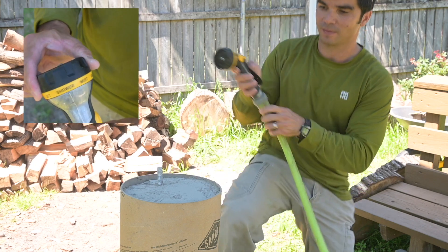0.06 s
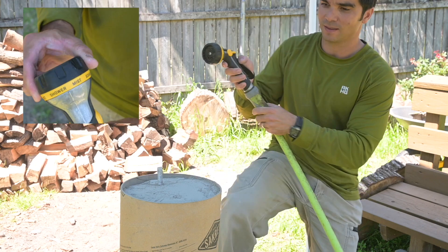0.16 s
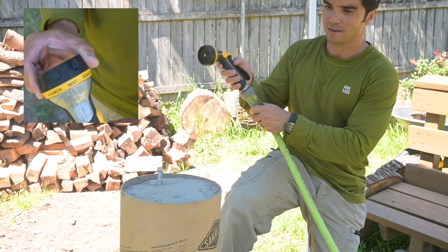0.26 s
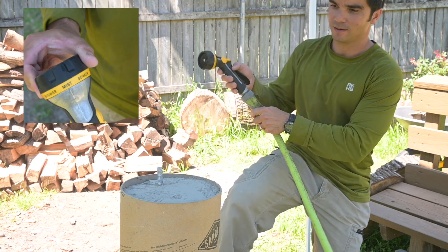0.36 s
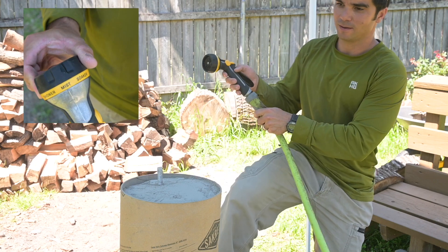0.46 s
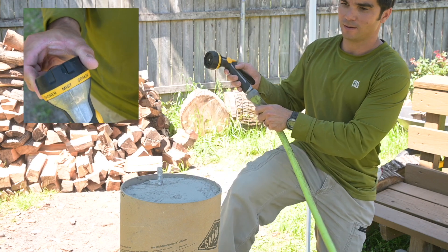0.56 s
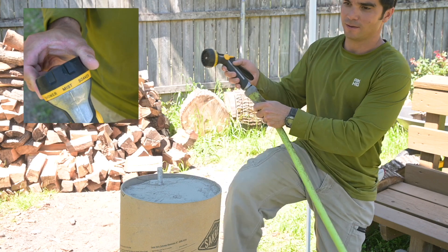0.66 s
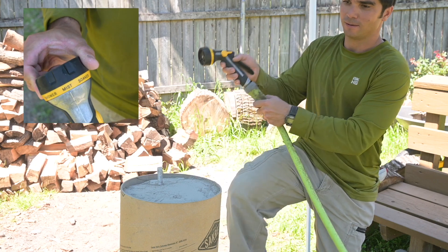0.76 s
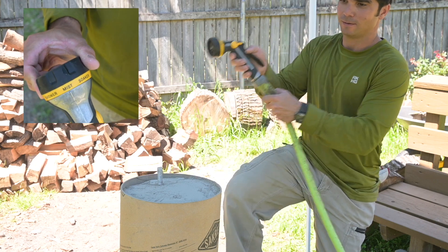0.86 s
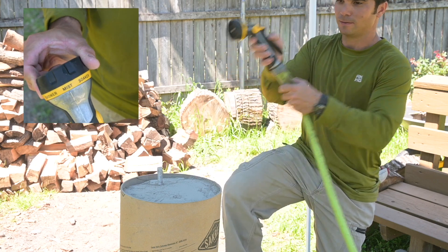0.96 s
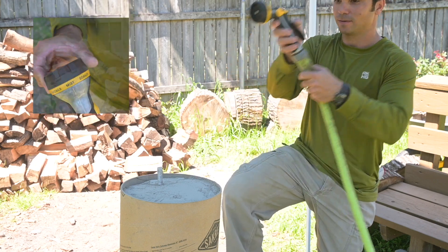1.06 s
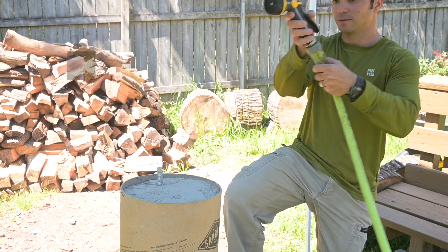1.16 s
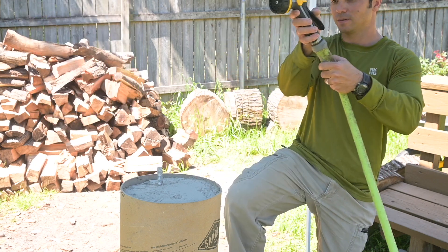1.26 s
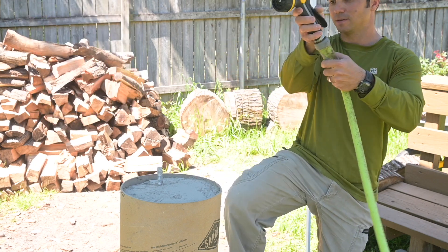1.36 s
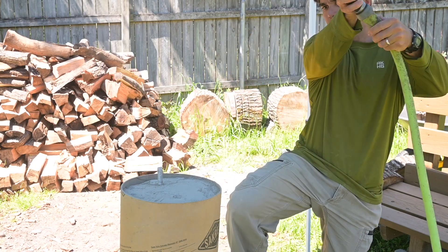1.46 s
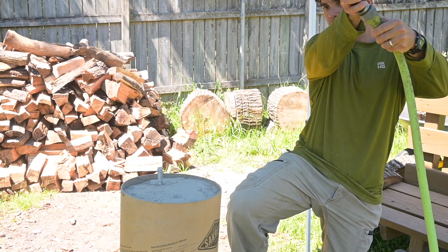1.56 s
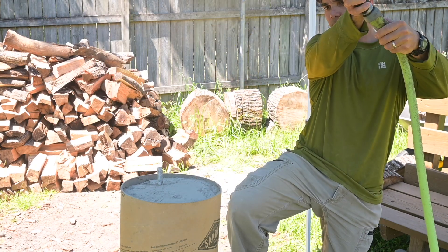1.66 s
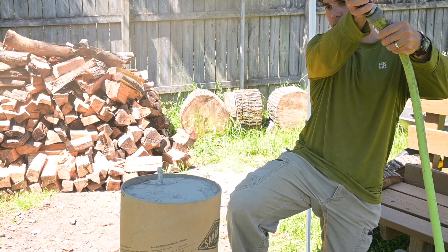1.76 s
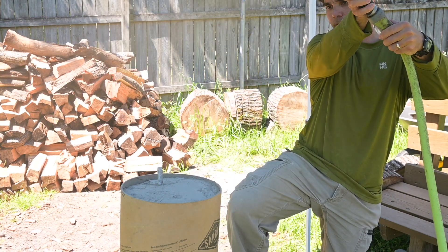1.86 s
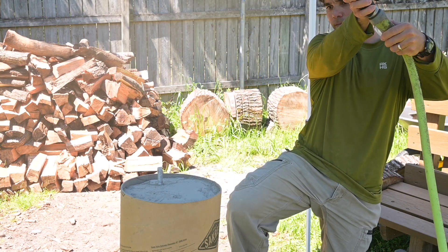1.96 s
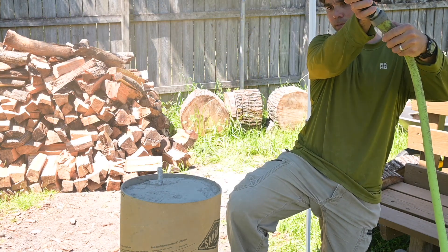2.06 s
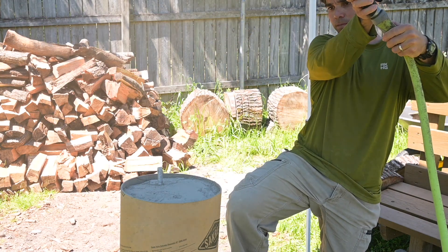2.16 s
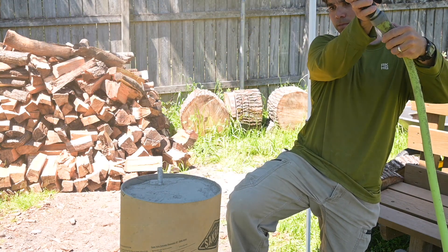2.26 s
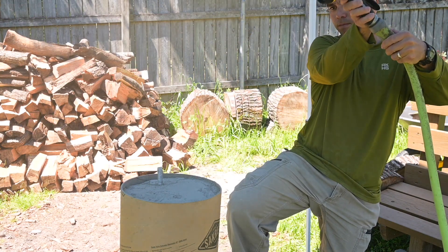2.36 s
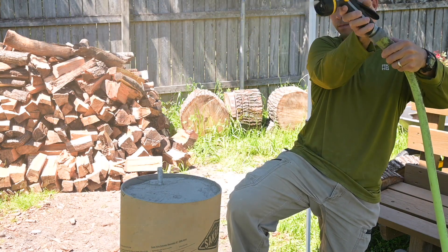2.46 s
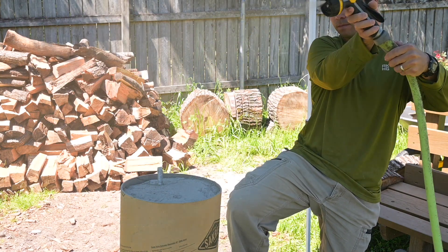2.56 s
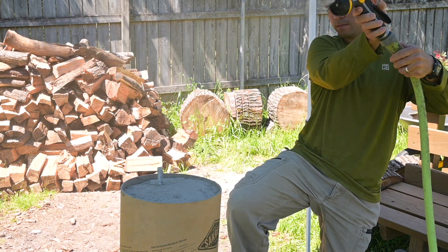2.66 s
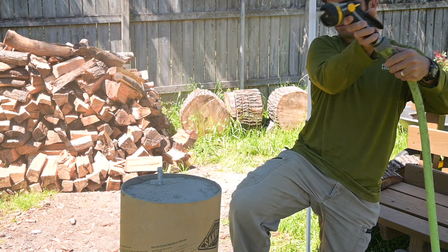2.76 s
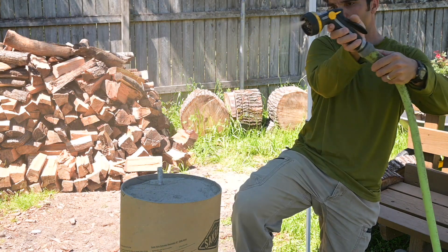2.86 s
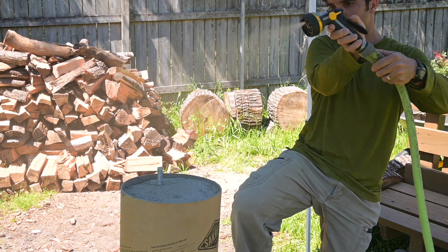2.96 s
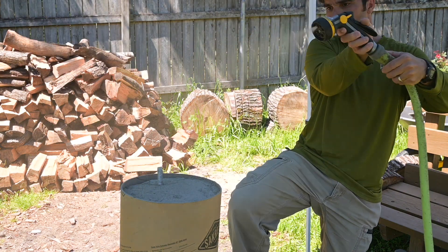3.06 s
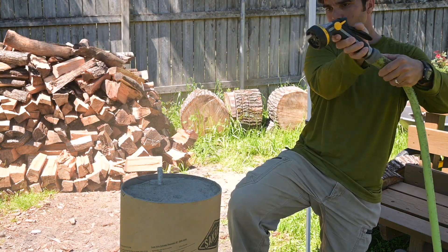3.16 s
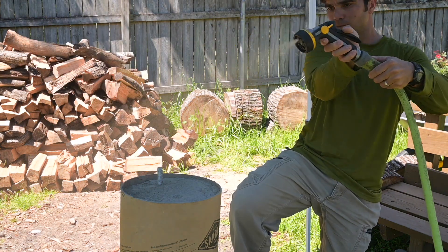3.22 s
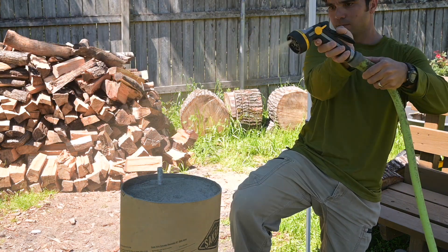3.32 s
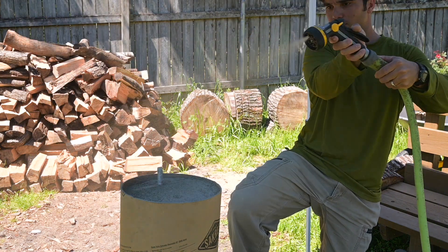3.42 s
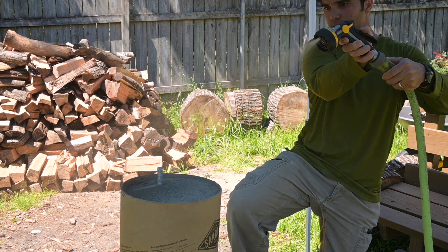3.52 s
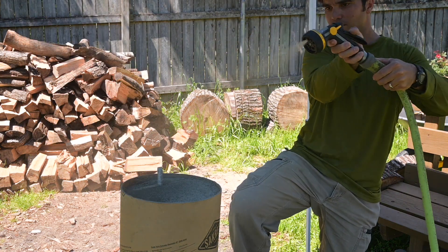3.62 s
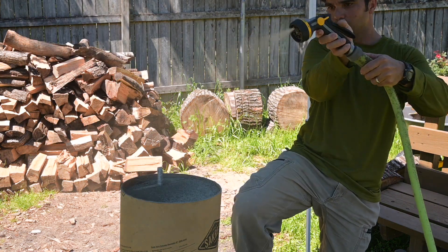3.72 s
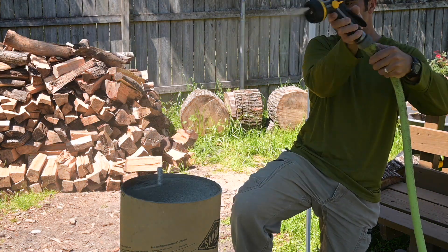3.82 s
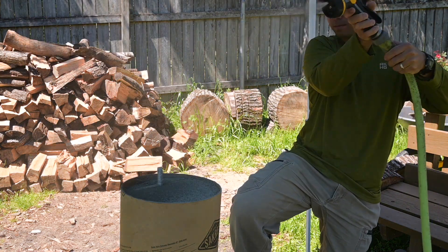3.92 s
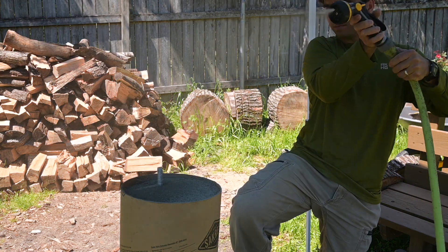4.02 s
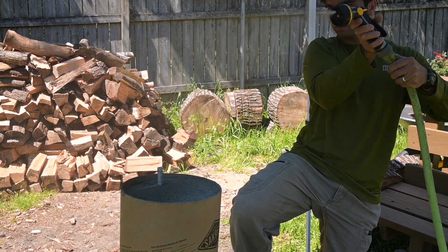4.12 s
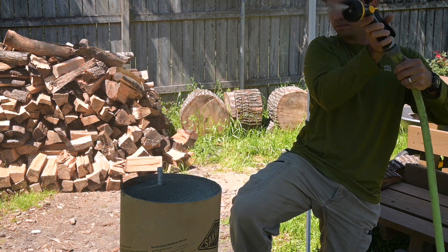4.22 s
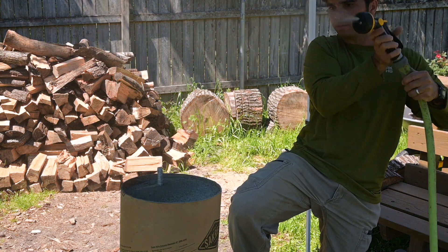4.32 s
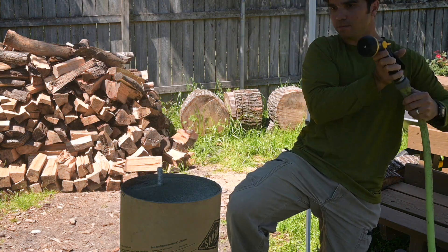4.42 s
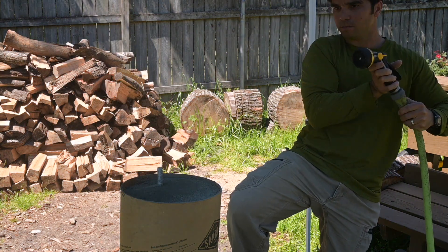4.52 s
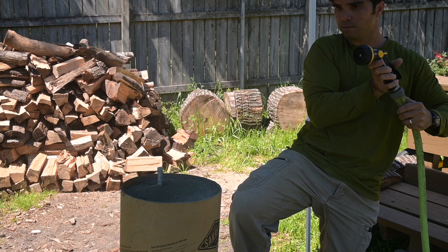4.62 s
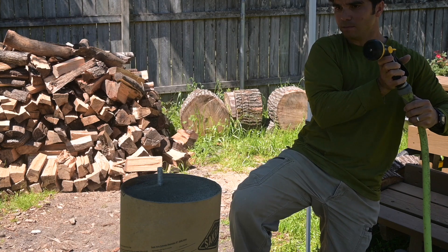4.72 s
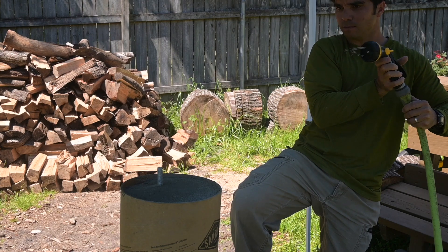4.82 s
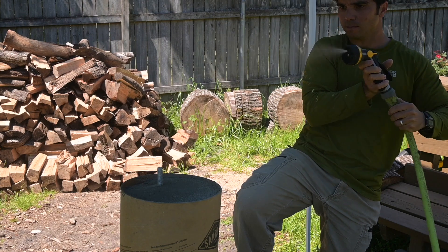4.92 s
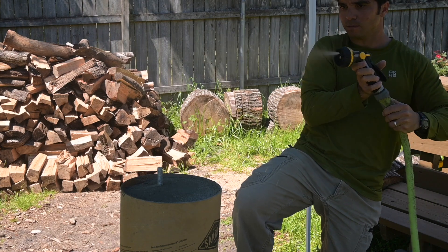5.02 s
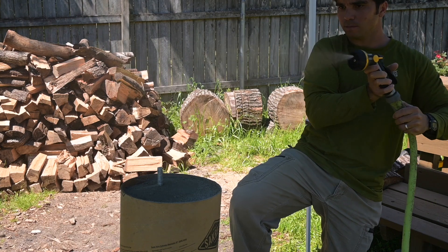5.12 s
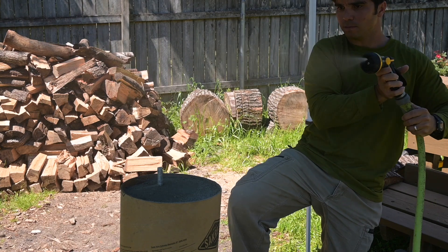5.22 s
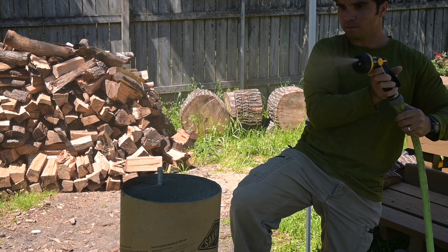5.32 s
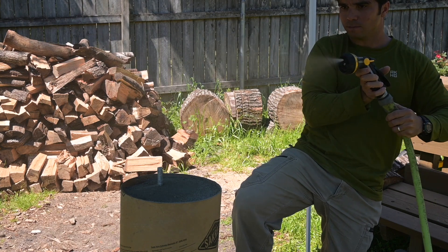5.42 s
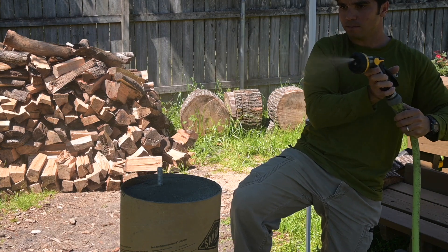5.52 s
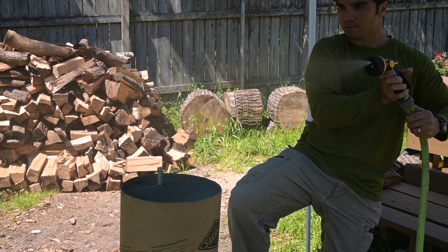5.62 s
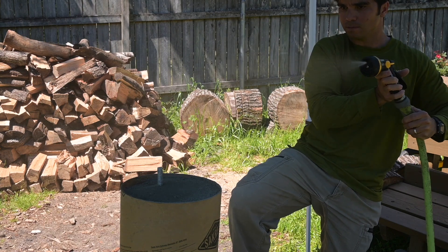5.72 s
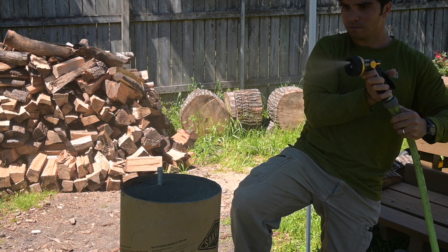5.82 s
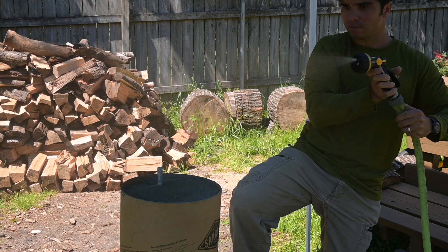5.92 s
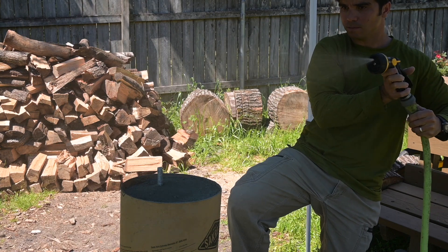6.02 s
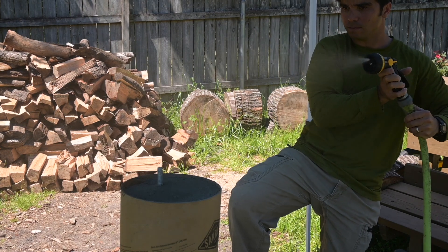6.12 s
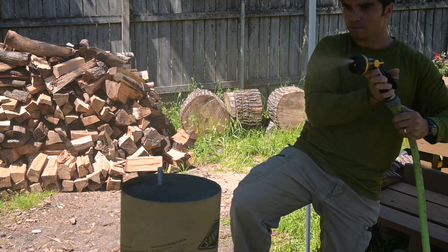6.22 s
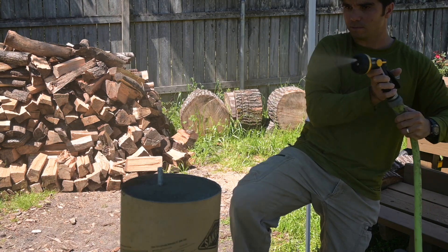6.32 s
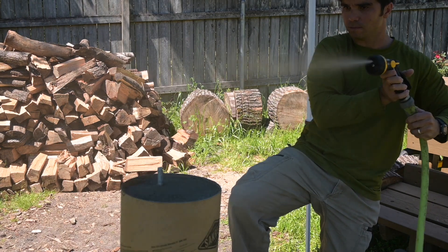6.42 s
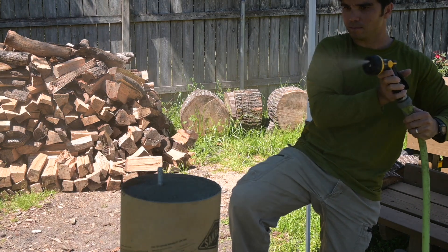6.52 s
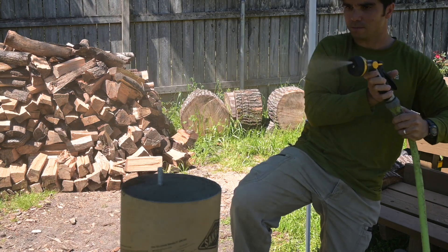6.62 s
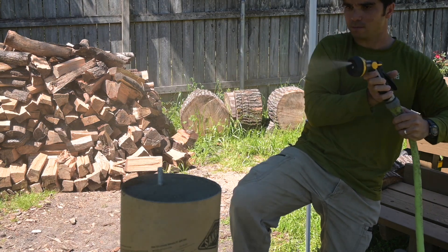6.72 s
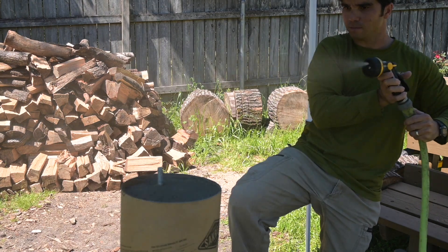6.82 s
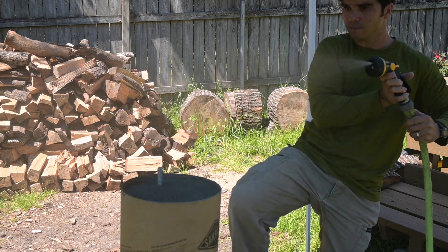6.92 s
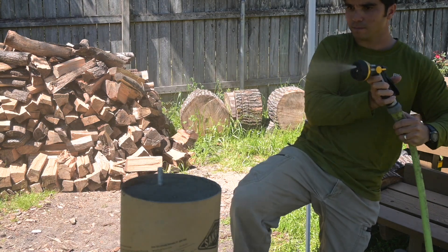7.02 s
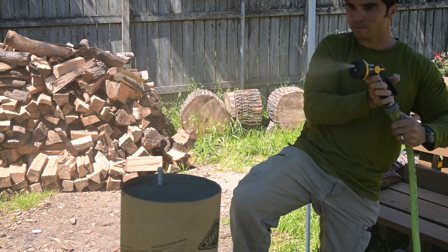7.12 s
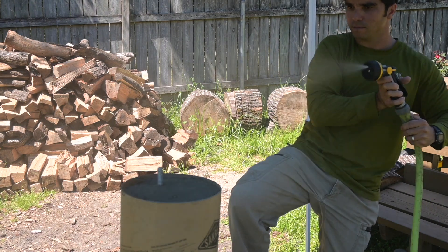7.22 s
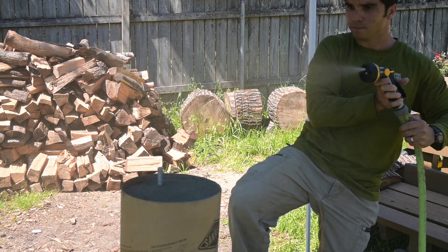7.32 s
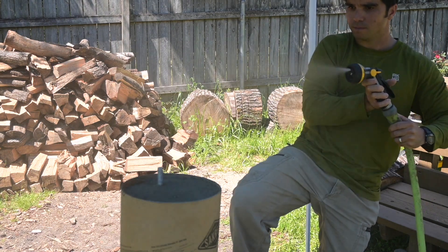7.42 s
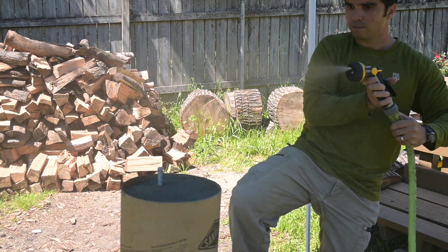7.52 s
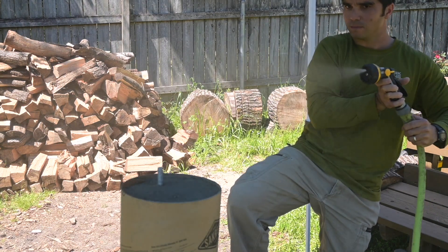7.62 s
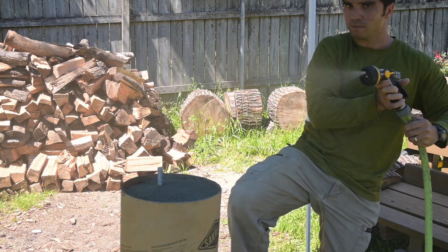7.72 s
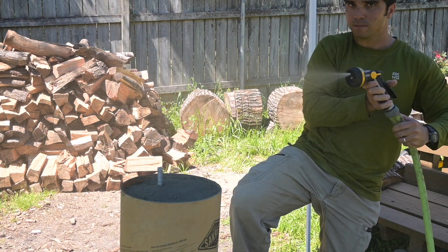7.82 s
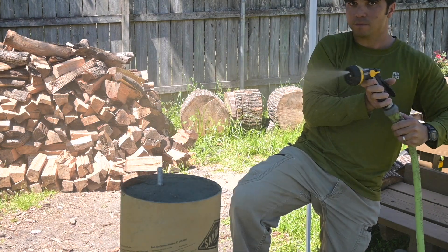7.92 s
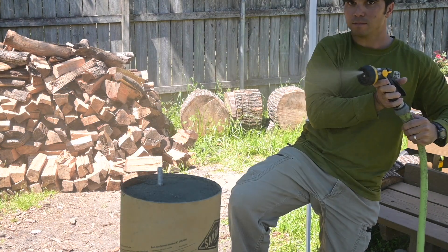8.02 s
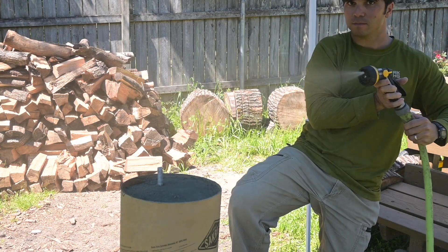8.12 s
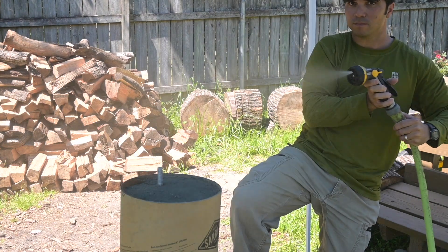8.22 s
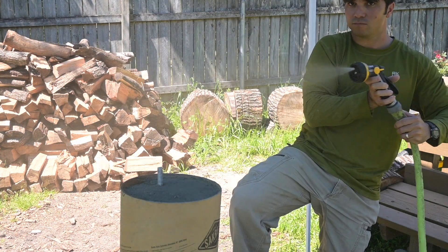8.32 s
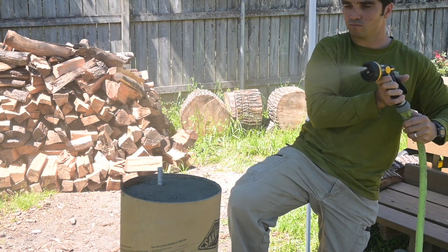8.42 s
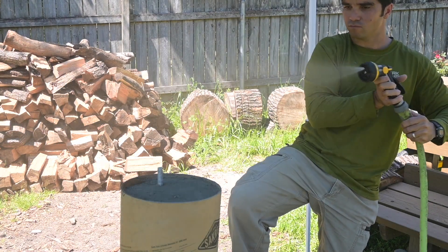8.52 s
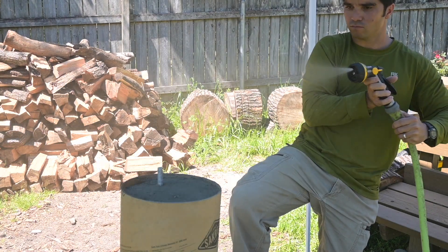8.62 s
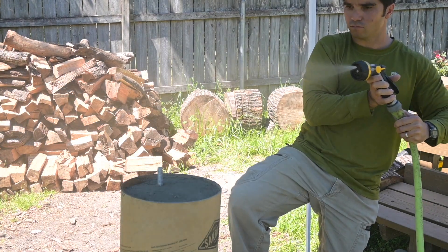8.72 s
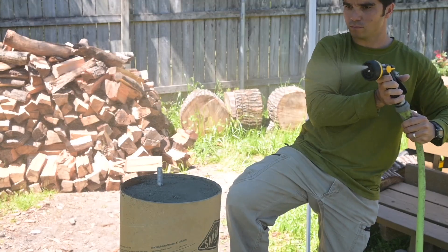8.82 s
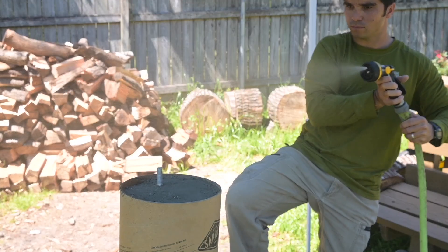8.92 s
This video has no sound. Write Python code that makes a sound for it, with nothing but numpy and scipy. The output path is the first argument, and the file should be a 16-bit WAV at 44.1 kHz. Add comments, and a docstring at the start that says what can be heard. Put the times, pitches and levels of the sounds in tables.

```python
"""A garden hose nozzle in a fenced yard, heard close up; insects sing far off throughout.
Sleeves rustle (swelling noise), water leaks faintly, the pattern dial snaps home (ringing shell modes), then
the background drops a little. The trigger opens on a fine, even mist (smooth filtered noise); trapped air
spits at once (dense bubble bursts) and trails off in single pops. It shuts, then opens again to the end:
air spits some 1.5 s into this second squeeze and trails off in pops, under a light breeze (low noise)."""
import sys
import numpy as np
from scipy import signal
from scipy.fft import rfft, irfft
from scipy.io import wavfile

SR = 44100
rng = np.random.default_rng(int(sys.argv[2]) if len(sys.argv) > 2 else 0)


def generate_wav(sig):
    """Save sig (samples, or channels by samples) to the path in sys.argv[1] as 16-bit PCM at SR."""
    pcm = np.round(np.clip(np.atleast_2d(sig).T, -1, 1) * 32767).astype(np.int16)
    wavfile.write(sys.argv[1], SR, pcm)


N = 395577
TIME = np.arange(N) / SR

# colour of a bursting bubble: (frequency [Hz], relative density [dB per Hz])
SPIT_COLOUR = [(100, -34), (400, -18), (630, -4.5), (980, -9.5), (1350, -5.5), (1900, -2.5), (3500, 2),
               (5400, 4), (6700, -4.5), (8300, -0.5), (10500, -1), (13500, -4.5), (16000, -8.5)]
# air pockets reaching the orifice: (time [s], rise [s], length [s], spit level [dB], sag [dB/s],
# bass blurt level [dB], trailing foam level [dB])
AIR_POCKETS = [(1.684, .02, 0.086, -20.5, 39, -44, -38.5), (6.377, 0.025, 0.14, -22, -1, -41.5, -43),
               (6.51, 0.12, 0.26, -22, 49.5, -57, -44.5)]


def from_db(db):
    """Decibels to gain."""
    return 10 ** (np.asarray(db) / 20)


def rms_one(x):
    """Scale to unit rms."""
    return x / np.sqrt(np.mean(x ** 2) + 1e-20)


def in_time(rows):
    """Each column of a curve, interpolated at every sample."""
    s, *columns = np.transpose(rows)
    return [np.interp(TIME, s, c) for c in columns]


def gate(start_s, end_s, rise_s, release_s):
    """Squared attack, hold, then a fall of 60 dB per release_s, down to -120 dB."""
    attack = np.clip((TIME - start_s) / rise_s, 0, 1) ** 2
    return attack * from_db(-60 * np.clip((TIME - end_s) / release_s, 0, 2))


def swells(rows):
    """Sum of Gaussian rises and falls, as one gain."""
    gain = 0
    for s, db, sigma_s in rows:
        distance = np.minimum(np.abs(TIME - s) / sigma_s, 10)
        gain = gain + from_db(db) * np.exp(-.5 * distance ** 2)
    return gain


def drift(rate_hz):
    """Slow random curve of unit rms, with rate_hz knots per second."""
    knots = rng.standard_normal(N // 10)
    return rms_one(np.interp(TIME * rate_hz, np.arange(len(knots)), knots))


def colour(x, spectrum):
    """Causal minimum-phase filter with this spectrum; white noise keeps its power."""
    size = 4096
    hz, db = np.transpose(spectrum)
    log_hz = np.log(np.maximum(np.fft.rfftfreq(size, 1 / SR), 1))
    outside = np.abs(log_hz - np.clip(log_hz, np.log(hz[0]), np.log(hz[-1])))
    target_db = np.interp(log_hz, np.log(hz), db) - 20 * outside
    cepstrum = irfft(np.log(from_db(target_db)))
    # keep the causal half only: minimum phase
    cepstrum[0] = 0
    cepstrum[size // 2:] = 0
    response = irfft(np.exp(rfft(2 * cepstrum)))
    return signal.oaconvolve(x, response / np.linalg.norm(response))[:N]


def noise(spectrum):
    """Steady coloured noise of about unit rms."""
    return colour(rng.standard_normal(N), spectrum)


def widen(spectrum, side_db):
    """Steady noise almost the same on both sides: a common part plus a weak opposed part."""
    return noise(spectrum) + from_db(side_db) * noise(spectrum) * [[1], [-1]]


def bursts(energy, decay_s):
    """Every impulse of energy lets off a short dying puff of turbulence."""
    r = np.exp(-1 / (decay_s * SR))
    power = signal.lfilter([1], [1, -r * r], energy + 1e-18)
    return np.sqrt(power) * rng.choice([-1, 1], N)


def ring(clicks, hz, t60_s):
    """A unit click sets a damped mode of height 1 ringing (two-pole resonator)."""
    r = from_db(-60 / (t60_s * SR))
    w = 2 * np.pi * hz / SR
    return signal.lfilter([0, np.sin(w)], [1, -2 * r * np.cos(w), r * r], clicks + 1e-18)


def yard(x, ground_db, scatter_db, ground_s=.0061, t60_s=0.094, low_hz=2500, high_hz=10000):
    """One echo off the ground, then a short bright scatter from fence and woodpile, unlike on each side."""
    age_s = TIME[:SR // 4]
    scatter = rng.standard_normal((2, len(age_s))) * from_db(-60 * age_s / t60_s) * (age_s > ground_s / 2)
    band = signal.butter(2, [low_hz, high_hz], "band", fs=SR, output="sos")
    scatter = signal.sosfilt(band, scatter)
    scatter /= np.linalg.norm(scatter, axis=1, keepdims=True)
    echo = from_db(ground_db) * np.interp(TIME - ground_s, TIME, x)
    scattered = signal.oaconvolve(x[None], scatter, axes=1)[:, :N]
    return x + echo + from_db(scatter_db) * scattered


def outdoors(air_db=-61, insect_db=-72, drop_s=1.29, early_air_db=2, early_insect_db=6.5, release_s=.12):
    """Distant neighbourhood hum and a thin insect band, both louder before drop_s; a light breeze."""
    # distant neighbourhood colour: (frequency [Hz], relative density [dB per Hz])
    far_air = [(20, -27), (60, -18.5), (120, -6.5), (200, -6.5), (310, 0.5), (420, 2), (750, -2),
               (1500, -6.5), (3200, -11.5), (5300, -15.5), (7000, -17), (16000, -22.5)]
    # insect band: (frequency [Hz], relative density [dB per Hz])
    insect_band = [(8000, -37), (9000, -14), (9500, 0), (10100, 1.5), (10450, -18.5), (14500, -31.5),
                   (14950, -10), (15300, -36)]
    # breeze rumble: (frequency [Hz], relative density [dB per Hz])
    gust = [(15, 6.5), (45, -5), (90, -3), (200, -14), (500, -43)]
    # breeze puffs on the microphone: (time [s], level [dB], Gaussian sigma [s])
    puffs = [(6.9, -82.5, 2), (7.95, -71, .27)]
    early = gate(-1.2, drop_s, 1, release_s)
    insects = from_db(insect_db + early_insect_db * early) * widen(insect_band, side_db=-19.0)
    hum = from_db(air_db + early_air_db * early) * widen(far_air, side_db=-25)
    return hum + insects + swells(puffs) * noise(gust)


def handling(grain_db=2.5, rise_s=0.00095, grip_hz=880, grip_t60_s=0.012):
    """Cloth rubs in fine catches; hands and hose bump softly against the hollow grip."""
    # rubbing cloth: (frequency [Hz], relative density [dB per Hz])
    cloth = [(100, -21.5), (400, -5.5), (1000, -0.5), (1900, -2.5), (3200, -11.5), (5500, -15),
             (7000, -17.5), (16000, -28)]
    # sleeve strokes: (time [s], level [dB], Gaussian sigma [s])
    strokes = [(.103, -45, 0.038), (.25, -58, 0.098), (.615, -54.5, 0.027), (.81, -59.5, 0.072),
               (1.17, -62, 0.097), (1.59, -58.5, 0.046), (5.94, -48, 0.071)]
    # soft bump: (frequency [Hz], relative density [dB per Hz])
    thud_colour = [(50, -18), (200, -5), (450, 5.5), (680, -4), (860, 1.5), (1150, -3), (2500, -19)]
    # scuff of a bump: (frequency [Hz], relative density [dB per Hz])
    scuff_colour = [(1000, -15), (2700, -6), (3600, 7), (4300, -5), (7500, -11.5), (10000, -17),
                    (16000, -30)]
    # hand and hose bumps: (time [s], thud level [dB], scuff level [dB], grip knock level [dB],
    # decay time constant [s])
    bumps = [(.148, -54, -49, -59, 0.0087), (.635, -61, -55.5, -43.5, 0.011),
             (0.756, -43, -41.5, -60, 0.011), (0.775, -41.5, -58, -41, 0.0036),
             (2.114, -54, -49, -36, 0.01), (5.985, -43.5, -68, -65.5, 0.017), (6.101, -48, -71, -60, 0.016)]
    out = swells(strokes) * from_db(grain_db * drift(250)) * noise(cloth)
    thud, scuff = noise(thud_colour), noise(scuff_colour)
    knock = rms_one(ring(noise(cloth), grip_hz, grip_t60_s))
    for s, thud_db, scuff_db, knock_db, decay_s in bumps:
        age_s = np.maximum(TIME - s, 0)
        touch = np.minimum(age_s / rise_s, 1) * np.exp(-np.minimum(age_s / decay_s, 20))
        out += touch * (from_db(thud_db) * thud + from_db(scuff_db) * scuff + from_db(knock_db) * knock)
    return out


def dial(detent_s=.3711, level_db=6, snap_db=-10, snap_s=0.0006, push_db=-7, push_s=0.00015):
    """The detent snaps home: one quick shove of air, and the small, well damped shell rings."""
    # plastic shell modes: (frequency [Hz], relative level [dB], t60 [s])
    shell_modes = [(1500, -16, 0.0045), (4000, 0.5, 0.0046), (5980, -5.5, 0.0043), (7280, -16, 0.012),
                   (9460, -4.5, 0.0032), (11600, -7.5, .003), (15600, -7.5, 0.0018)]
    click = np.zeros(N)
    click[round(detent_s * SR)] = from_db(level_db)
    shell = 0
    for k, (hz, db, t60_s) in enumerate(shell_modes):
        shell = shell + (-1) ** k * from_db(db) * ring(click, hz, t60_s)
    push = signal.lfilter([from_db(push_db)], [1, -np.exp(-1 / (push_s * SR))], click + 1e-18)
    return shell + push + from_db(snap_db) * bursts(click ** 2, snap_s)


def water_flow(valve_open_s=0.039, valve_shut_s=.1):
    """Gain of the flow through the valve: a faint leak until the dial seats, then two squeezes."""
    # valve openings: (opens [s], shuts [s], flow [dB re fully open])
    openings = [(0.194, .362, -13.5), (1.636, 4.392, -0.5), (4.889, 9, -0.5)]
    return sum(from_db(db) * gate(opens, shuts, valve_open_s, valve_shut_s) for opens, shuts, db in openings)


def air_flow(spit_release_s=.2, blurt_release_s=0.1, foam_clears_db_per_s=17):
    """Each pocket spits and blurts while it empties, then leaves foam that clears slowly: three gains."""
    spit = blurt = foam = 0
    for s, rise_s, length_s, spit_db, sag_db_per_s, blurt_db, foam_db in AIR_POCKETS:
        end_s = s + length_s
        sag_db = sag_db_per_s * np.clip(TIME - s, 0, length_s)
        spit = spit + from_db(spit_db - sag_db) * gate(s, end_s, rise_s, spit_release_s)
        blurt = blurt + from_db(blurt_db - sag_db) * gate(s, end_s, rise_s, blurt_release_s)
        foam = foam + from_db(foam_db) * gate(s, end_s, length_s, 60 / foam_clears_db_per_s)
    return spit, blurt, foam


def whistle(flow, spit, hz=1410, t60_s=0.069, waver_hz=22, steady_db=-62, near_air_db=-52, with_spit_db=-20,
            lead_s=0.19, rise_s=.04, release_s=0.27):
    """The head's cavity sings faintly and wavers, louder as an air pocket draws near and while it passes."""
    near_air = np.max([gate(s - lead_s, s, rise_s, release_s) for s, *_ in AIR_POCKETS], axis=0)
    strength = flow * (from_db(steady_db) + from_db(near_air_db) * near_air) + from_db(with_spit_db) * spit
    tone = rms_one(ring(rng.standard_normal(N), hz, t60_s))
    # a warped clock bends the pitch
    clock_s = TIME + np.cumsum(waver_hz / hz * drift(12)) / SR
    return strength * np.interp(clock_s, TIME, tone)


def slugs(blurt, per_s=450, spread_db=3):
    """Slugs of air and water take turns in the orifice, each with a low, uneven shove."""
    # slug of air: (frequency [Hz], relative density [dB per Hz])
    slug_colour = [(30, -31), (90, -23), (200, 2), (400, 5), (600, -14), (2000, -33)]
    sizes = from_db(spread_db * rng.standard_normal(N))
    shoves = (rng.random(N) < per_s / SR) * sizes * rng.choice([-1, 1], N)
    return blurt * rms_one(colour(shoves, slug_colour))


def large_bubbles(foam, pop_db=-4.0, stray_per_s=50, stray_db=-23, spread_db=1.5, decay_s=0.00026,
                  spatter_db=-11, spatter_s=0.0034):
    """Large bubbles crack and their torn film spatters; chance strays get fewer and smaller as foam clears."""
    # loudest single bubbles: (time [s], relative level [dB])
    pops = [(1.6934, -9.5), (1.8277, -13), (1.8987, -17.5), (1.9514, -13), (2.0315, -14.5), (2.2679, -21),
            (2.3396, -17), (2.796, -19), (3.3568, -19.5), (4.131, -18), (4.1862, -22), (6.9675, -18),
            (6.998, -12.5), (7.0323, -14.5), (7.0966, -16.5), (7.2711, -14.5), (7.2975, -14), (7.4839, -26),
            (7.6761, -21.5), (7.8047, -19.5), (8.0183, -21)]
    froth = foam / foam.max()
    strays = rng.random(N) < stray_per_s * froth / SR
    stray_sizes = from_db(stray_db + spread_db * np.clip(rng.standard_normal(N), -2, 2))
    energy = strays * froth * stray_sizes ** 2
    for s, db in pops:
        energy[round(s * SR)] = from_db(db + pop_db) ** 2
    crack = bursts(energy, decay_s)
    spatter = from_db(spatter_db) * bursts(energy, spatter_s)
    return colour(crack + spatter, SPIT_COLOUR)


def trapped_air(air, full_per_s=5000, crowding_power=.85, spread_db=4.0, decay_s=0.00063, surge_db=0.35,
                cavity_db=-15):
    """Compressed bubbles burst leaving the orifice, more with more air: a dense spit thinning to crackle."""
    # resonances of the water-filled nozzle and hose: (frequency [Hz], relative level [dB], t60 [s])
    cavity_modes = [(642, -14, 0.012), (1247, -8, 0.044), (1423, -7.5, 0.056), (1810, -13, 0.098),
                    (2770, -19.5, 0.062), (3500, -8.5, 0.057)]
    per_s = full_per_s * (air / air.max()) ** crowding_power + 1
    born = rng.random(N) < per_s / SR
    sizes = rms_one(from_db(spread_db * np.clip(rng.standard_normal(N), -2, 2)))
    share = 2 / (per_s * decay_s)  # the fewer the bubbles, the more power each carries
    surge = from_db(surge_db * drift(90))
    energy = born * share * (sizes * air * surge) ** 2
    spit = colour(bursts(energy, decay_s), SPIT_COLOUR)
    hollow = sum(from_db(cavity_db + db) * rms_one(ring(spit, hz, t60_s)) for hz, db, t60_s in cavity_modes)
    return spit + np.std(spit) * hollow


def mist(flow, flutter_db=0.64, fizz_db=-4.5, fizz_power=1.1):
    """The jet tears into countless droplets: a smooth hiss, with a fizz that weakens faster with pressure."""
    # jet level as the nozzle is lowered and turned away: (time [s], level [dB])
    aim = [(1.7, -45.5), (3.6, -43.5), (4.4, -46.5), (5.3, -46.5), (8.97, -46)]
    # jet: (frequency [Hz], relative density [dB per Hz])
    hiss = [(150, -32.5), (350, -15.5), (600, -7), (1000, -3), (1400, -0.5), (1900, -2), (2500, -3),
            (3400, -1.5), (4400, -3), (5500, 0.5), (5950, -1), (6500, -14.5), (9000, -39.5)]
    # finest spray: (frequency [Hz], relative density [dB per Hz])
    fizz = [(4500, -27), (6300, 0), (7200, -1.5), (8300, 0.5), (9200, -2.5), (10500, 0.5), (11800, -5.5),
            (13000, -2), (16000, -10.5)]
    aim_db, = in_time(aim)
    pressure = flow * from_db(aim_db - aim_db.max())
    jet = pressure * noise(hiss) + from_db(fizz_db) * pressure ** fizz_power * noise(fizz)
    return from_db(aim_db.max() + flutter_db * drift(25)) * jet


def scene(stray_air_db=-60):
    """Water always carries a little air; sharp sounds wake the yard, mist and background are diffuse."""
    flow = water_flow()
    spit, blurt, foam = air_flow()
    air = np.sqrt(spit ** 2 + foam ** 2 + (from_db(stray_air_db) * flow) ** 2)
    hands = yard(dial() + handling(), ground_db=-31.5, scatter_db=-32.0)
    sputter = yard(trapped_air(air) + large_bubbles(foam), ground_db=-12, scatter_db=-63.0)
    return outdoors() + hands + whistle(flow, spit) + slugs(blurt) + sputter + mist(flow)


def record(dry, cutoff_hz=16600):
    """The snap overloads the input (hard clip); a steep low-pass cuts the top."""
    low_pass = signal.cheby2(18, 60, cutoff_hz, fs=SR, output="sos")
    return signal.sosfilt(low_pass, np.clip(dry, -1, 1))


dry = scene()
out = record(dry)
generate_wav(out)
```